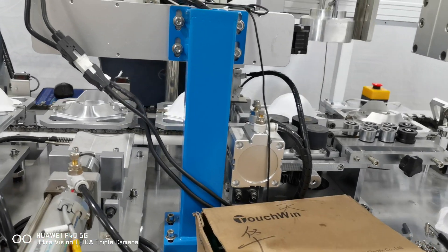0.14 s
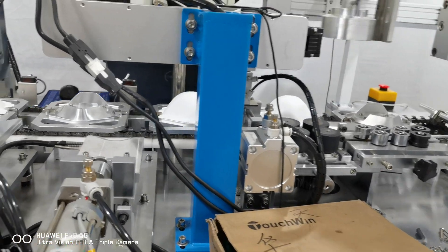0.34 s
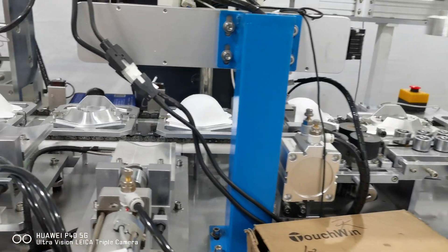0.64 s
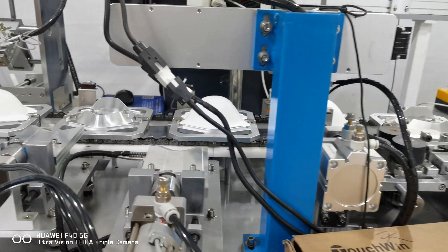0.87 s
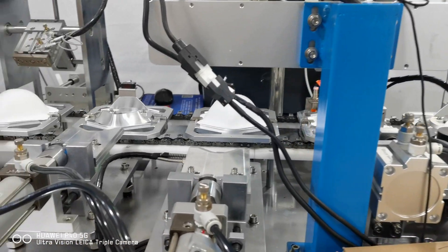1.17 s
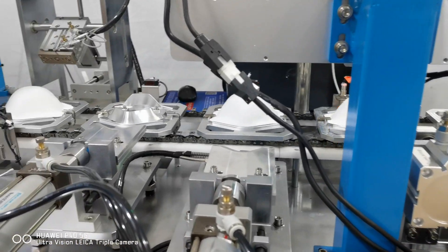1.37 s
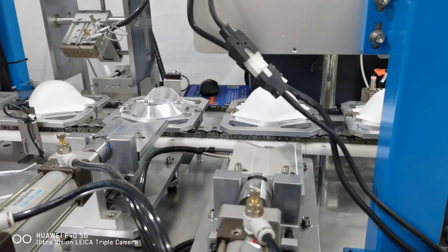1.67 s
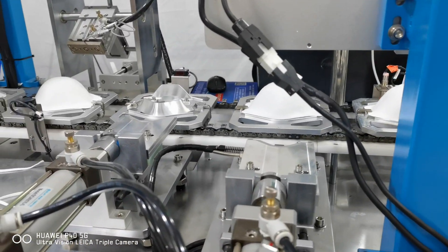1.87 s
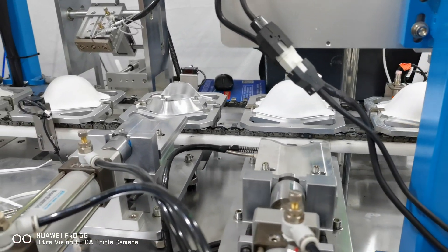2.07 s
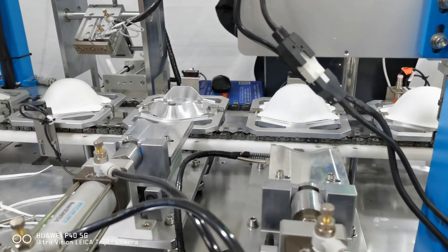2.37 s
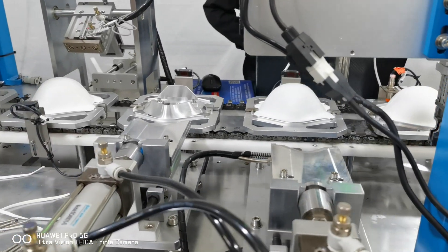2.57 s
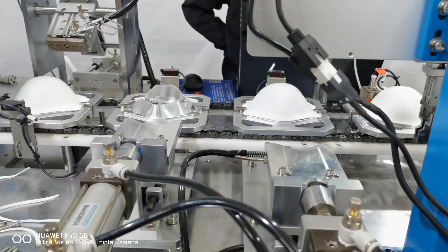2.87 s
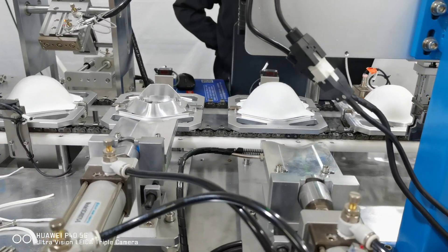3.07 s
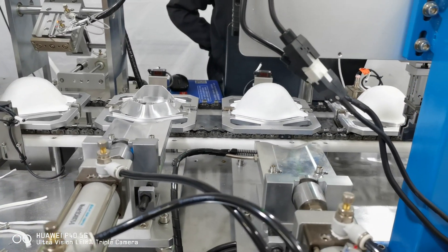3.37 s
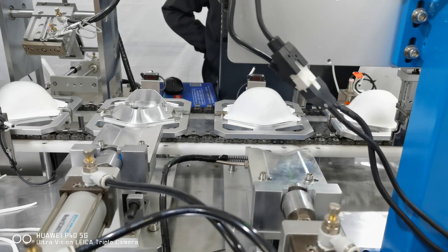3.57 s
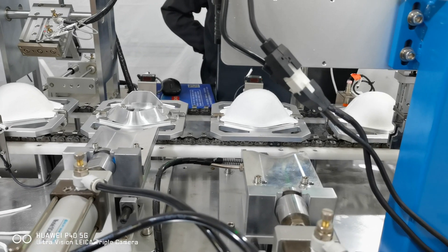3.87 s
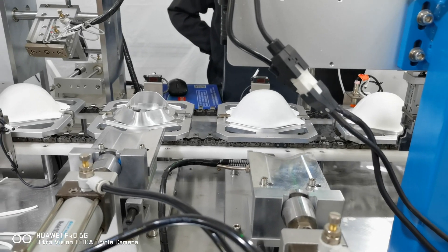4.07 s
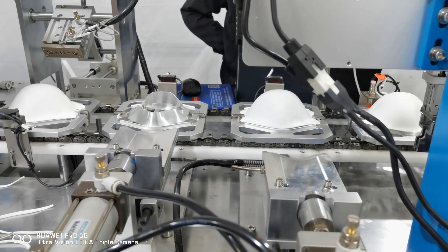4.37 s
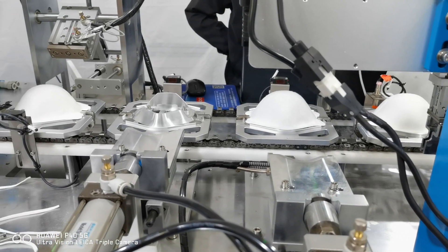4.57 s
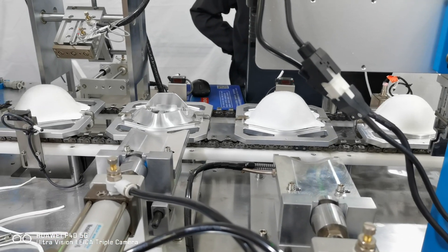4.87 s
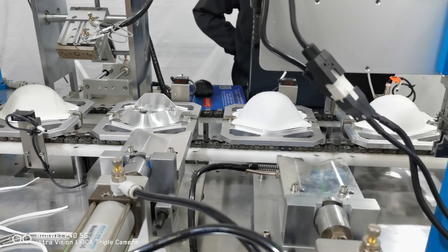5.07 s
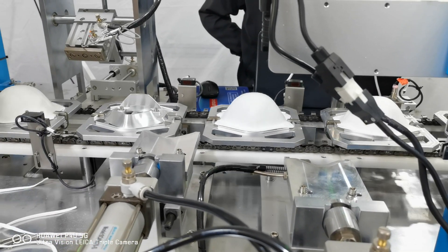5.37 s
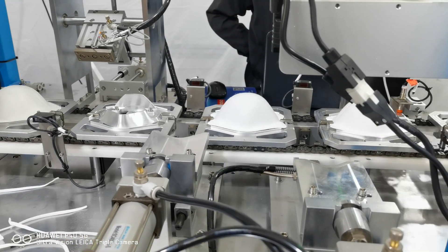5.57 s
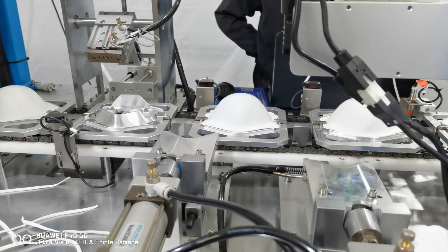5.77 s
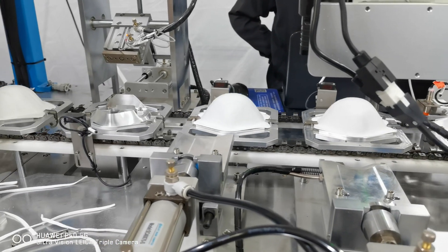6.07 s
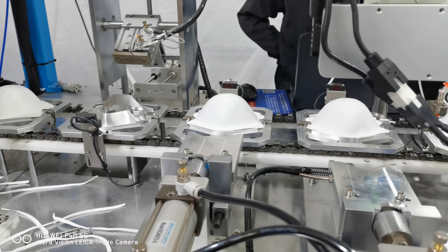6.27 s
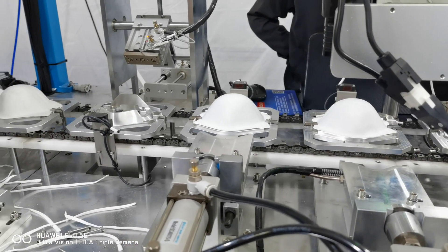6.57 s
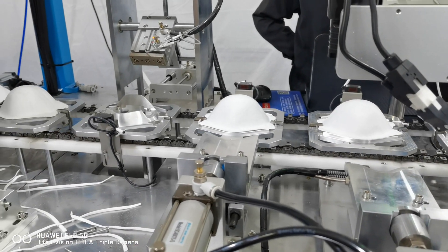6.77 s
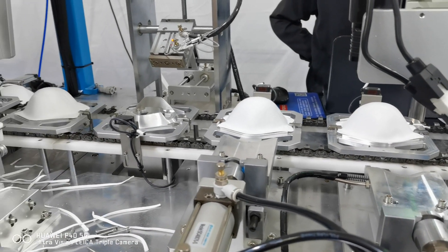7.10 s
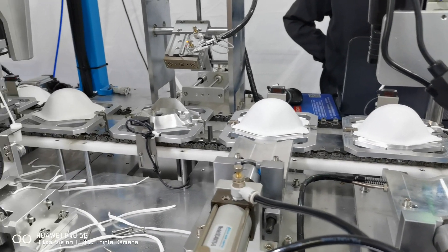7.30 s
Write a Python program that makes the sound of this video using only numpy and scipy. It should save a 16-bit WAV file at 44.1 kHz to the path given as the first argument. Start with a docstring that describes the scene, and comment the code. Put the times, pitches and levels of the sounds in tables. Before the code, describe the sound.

Factory machine venting compressed air in long hisses and short puffs, with valve clacks, thuds and a very high-pitched whistle.

```python
"""A factory hall with an automatic mask line, heard a metre away by a hand-held microphone pair.
Air cylinders vent as turbulent jets, in long spitting hisses and short puffs. The horn of an ultrasonic
welder whistles near the top of hearing, fading at the nodes of its standing waves. Impacts excite
damped modes: valves and stops clack, slides thud into the frame, metal rings on. Drives whine
faintly, the chain scrapes and the hall rumbles underneath."""
import sys
import numpy as np
from scipy import signal
from scipy.fft import rfft, irfft
from scipy.io import wavfile
from scipy.ndimage import uniform_filter1d

SR = 44100
rng = np.random.default_rng(int(sys.argv[2]) if len(sys.argv) > 2 else 0)


def put_to_file(sound):
    """Save the sound as 16-bit audio at rate SR, in the file named by the first command-line argument."""
    columns = np.atleast_2d(sound).T  # one column per channel
    safe = np.clip(columns, -1, 1)
    whole_steps = np.round(safe * 32767)
    wavfile.write(sys.argv[1], SR, whole_steps.astype(np.int16))


N = 328104
T = np.arange(N) / SR
HZ = np.maximum(np.arange(N // 2 + 1) * SR / N, 1)

# Noise spectra. Each row: frequency in Hz, relative spectral density in dB.
JET_SPECTRUM = [(2060, -30), (3500, -20.5), (4390, -12.5), (4920, -10), (5680, -3.5), (6360, -5),
                (7240, -5.5), (8800, -1.5), (9560, -5.5), (12000, -26), (15600, -47), (22000, -120)]
HOSE_SPECTRUM = [(760, -19), (1300, -10.5), (1520, -13.5), (2030, 1.5), (2290, -0.5), (2480, 2), (3240, 0),
                 (4600, -7), (5980, -11.5), (10100, -120)]
FINE_HISS_SPECTRUM = [(6470, -73.5), (11000, 13), (11800, 6.5), (13100, 3.5), (15100, 7.5), (16000, -55)]
RUMBLE_SPECTRUM = [(15, -69), (25, -36), (48, -11), (66, -2), (102, -1), (200, 1), (251, -4.5), (288, -0.5),
                   (500, -36), (650, -18), (1100, -120)]
SLIDE_SPECTRUM = [(210, -58), (360, 0.5), (461, -5), (518, -7), (650, -3), (1360, -6.5), (1700, -7.5),
                  (2210, -14), (3740, -120)]
# Releases of air. Each row: start, swell and hold in seconds, bright jet level in dB, dull jet and
# hose roar in dB relative to it.
AIR_RELEASES = [(-.1, 0.065, 1.476, -17.5, -5.5, -21), (-.1, 0.054, 0.4, -35, 9, -0.5),
                (1.458, 0.017, 0.21, -27, -5, -5.5), (1.756, 0.017, 0.028, -39.5, 6, -1),
                (1.849, 0.089, 0.12, -30, -6.5, -13), (2.266, 0.069, 0.028, -37.5, 0, -6.5),
                (2.39, 0.097, 0.024, -25.5, -2.5, -10), (2.582, 0.0087, 0.021, -29, -2, -5.5),
                (2.666, 0.01, 0.077, -26.5, 0, -8.5), (2.76, 0.049, 0.11, -36.5, -5, -13),
                (2.93, 0.18, .03, -30, -2, -14), (3.241, 0.02, 0.032, -29, -1, -11),
                (3.368, 0.0087, 0.018, -29, 0, -9), (3.454, 0.14, 0.48, -41, -2, -13.5),
                (3.906, 0.084, 0.16, -33.5, -2.5, -12), (4.17, 0.097, 0.11, -30.5, -3, -20),
                (4.39, 0.026, 0.11, -31.5, -6, -22), (4.587, 0.045, 0.062, -25, 1.5, -13.5),
                (4.717, 0.14, 1.57, -15, -5, -19), (6.45, 0.0086, 0.036, -22, 0.5, -12.5),
                (6.54, 0.0083, 0.099, -23, -2.5, -10), (6.657, 0.023, 0.094, -30, 2.5, -9.5),
                (6.803, 0.041, 0.16, -28.5, 0, -5), (7.021, 0.03, 0.01, -21.5, 0.5, -12.5),
                (7.271, 0.022, 0.011, -29.5, 1.5, -10), (7.383, 0.046, 0.13, -32, -8, -7)]
# The steady leak. In order: bright jet, dull jet and hose levels in dB.
STEADY_LEAK_DB = [-45, -49, -55]
# Pitch of the welder's horn. Each row: time in seconds, frequency in Hz.
HORN_PITCH = [(1, 15240), (1.2, 15240), (2.06, 15012), (3.3, 15012), (6.78, 15215), (7.05, 15205),
              (7.44, 15105)]
# Power steps as the horn presses the work. Each row: start and end in seconds, left and right in dB.
HORN_POWER = [(0.996, 1.67, -22.5, -29), (1.696, 2.084, -12, -17.5), (2.055, 3.002, 0.5, -4.5),
              (6.796, 7.067, -24.5, -29), (7.06, 7.6, -16, -26)]
# Standing-wave nodes, a left list and a right. Each row: time in seconds, depth in dB, half width
# in seconds.
HORN_NODES = [
    [(1.38, 7, 0.036), (1.495, 8, 0.025), (1.594, 18, 0.013), (1.736, 21, 0.03), (2.05, 22, 0.039),
     (2.2, 21, 0.0067), (2.41, 11, 0.054), (2.53, 13, 0.16), (6.985, 10, 0.064), (7.2, 13, 0.017),
     (7.347, 28, 0.0068)],
    [(1.08, 18, 0.036), (1.5, 15, .04), (2.118, 15, 0.017), (2.204, 23, 0.0091), (2.365, 13, 0.018),
     (2.57, 16, 0.046), (2.883, 17, 0.014), (7.146, 12, 0.031), (7.215, 20, 0.019), (7.358, 13, 0.018)],
]
# Phase of the horn tone. Each row: time in seconds, lead of left over right in cycles.
HORN_LEAD = [(1.0, -3.5), (1.79, .5), (1.895, 1.5), (2.03, 5), (2.135, 5.5), (2.55, 5.5), (2.75, 6.5),
             (2.92, 5), (6.8, 7.5), (7.3, 4.5)]
# Valves and end stops. Each row: start in seconds, level in dB, ring frequency in Hz, ring T60 in
# seconds, relative level of the low modes in dB, left minus right in dB.
VALVE_HITS = [(1.458, -8, 5960, 0.11, -44, -7), (1.482, -4, 6300, 0.26, -43, -4.5),
              (1.582, -12.5, 8200, 0.15, -19.5, 4), (1.7668, -18, 6600, 0.15, -27, -7),
              (2.097, -23.5, 9400, 0.067, -19, 8), (2.5094, -18, 4860, 0.17, -38, -6),
              (2.5898, -5, 8700, 0.075, -37, 1), (3, -22, 8100, 0.21, -24, -2),
              (3.111, -5, 9340, 0.034, -32.5, 0), (3.2747, -13, 9150, 0.083, -25.5, 2),
              (3.379, -8, 8650, 0.13, -30.5, 0), (4.0498, -12.5, 8700, 0.099, -19.5, 1),
              (4.472, -15, 8400, 0.11, -31, 2), (4.605, -20, 6200, 0.25, -40, -5),
              (4.694, -9, 8750, 0.091, -30, -1), (6.4596, -10.5, 5970, 0.15, -28, -7),
              (6.4867, -8.5, 6300, 0.085, -49, -14), (6.59, -10, 8640, 0.11, -19.5, 1),
              (7.0434, -12.5, 6600, 0.15, -29, -9), (7.297, -17.5, 9250, 0.081, -33, 10)]
# Modes of a stop and of the machine bed. Each row: frequency in Hz, bandwidth in Hz, level in dB.
STOP_RESONANCES = [(1940, 300, 4), (2430, 180, 2.5), (2790, 140, 6.5), (3250, 590, 3), (4500, 2000, 3)]
BED_RESONANCES = [(89, 27, 2), (126.2, 27, 7.5), (177, 26, 5), (254.6, 47, 2), (313, 96, 6),
                  (443, 113, 4.5)]
# Slides landing. Each row: start in seconds, level in dB, T60 at 200 Hz in seconds, best-struck
# frequency in Hz, fall-off from it in dB per octave, relative plate and upper rattle levels in dB.
LANDINGS = [(0.085, -16, 0.84, 200, 7.5, -13, -8.5), (1.374, -28, 0.61, 135, 4, -1, 3),
            (1.482, -15, 0.46, 460, 20, -9.5, -7.5), (1.577, -28, 1, 318, 2.5, -5.5, -12),
            (1.947, -28, 0.43, 89, 42, -3, -1), (2.059, -38.5, 0.35, 87, -4.5, 7.5, -12),
            (2.358, -37, 0.65, 177, 0, 0.5, 4), (2.588, -33, 0.84, 186, 10, 2.5, -6),
            (2.672, -16, 0.69, 277, 20, -11.5, -8), (2.994, -26.5, 0.82, 206, 21, -6, -9),
            (3.377, -25, 0.68, 186, 29, -5.5, -8), (3.983, -28.5, 0.89, 207, 18, -23, -18),
            (4.237, -32, 1, 116, 10, -23, -9.5), (4.59, -34, 1, 118, 0, -3.5, -16),
            (4.691, -26, 0.79, 241, 22, -9, -10), (5.459, -31, 0.56, 91.5, 7, -9, -15),
            (5.818, -24, 1, 159, 1, -3, 6.5), (6.474, -17.5, 0.53, 460, 10, -11, -14),
            (6.569, -23, 1, 261, 11, -5.5, -2), (6.838, -23.5, 0.55, 110, 13, -8.5, -16),
            (6.939, -33, 0.22, 95, 18.5, 11, 14.5), (7.041, -14.5, 0.8, 433, 9, -7.5, -8)]
# Ringing metal parts, low knocks and the hum of thuds. Each row: start in seconds, frequency in Hz,
# level in dB, T60 in seconds.
IMPACT_TONES = [(0.083, 166, -29, 0.55), (0.106, 314, -28, 0.66), (1.405, 457, -30.5, 0.31),
                (1.478, 454, -28, 0.35), (1.578, 1620, -28, .25), (1.77, 2110, -32.5, .12),
                (1.766, 5480, -20.5, 0.24), (1.776, 3811, -34.5, 0.35), (1.942, 718, -34.5, 0.081),
                (2.057, 92, -29, 0.17), (2.093, 128, -26, .06), (2.093, 1840, -33, 0.11),
                (2.092, 13100, -24, .12), (2.11, 274, -36, 0.38), (2.384, 2130, -32, 0.16),
                (2.592, 684, -35, .2), (2.674, 281, -31, .4), (2.996, 799, -33.5, 0.21),
                (2.997, 2560, -31.5, .12), (3.111, 1780, -40, 0.11), (3.603, 1970, -43, 0.11),
                (3.38, 4290, -30, .15), (3.272, 4760, -23, .1), (3.796, 2570, -38, 0.13),
                (4.049, 2400, -17.5, 0.028), (4.049, 4350, -28, 0.037), (4.052, 1365, -25.5, .22),
                (4.698, 453, -30.5, 0.29), (5.816, 134, -21, 0.37), (6.5, 280, -29, 0.43),
                (6.611, 125, -31, 0.57), (6.579, 1643, -23, 0.35), (7.042, 428, -22, 0.29),
                (7.058, 1340, -19.5, 0.3), (7.138, 300, -27, 0.41), (7.295, 6490, -13, 0.15),
                (7.345, 6450, -25, 0.24)]
# A cylinder emptying. Each row: time in seconds, frequency in Hz, level in dB.
SIGH_CURVE = [(3.0, 5900, -45), (3.09, 5400, -34.5), (3.24, 4700, -41), (3.34, 4300, -49)]
# Drive electronics and motors. Each row: start and end in seconds, frequency in Hz, level in dB.
DRIVE_TONES = [(0, 7.1, 8003, -50), (1.5, 4.6, 8103, -52), (2.3, 2.95, 10680, -51), (7.07, 7.5, 10640, -55),
               (3.8, 4.03, 870, -54), (.45, 1.05, 880, -57), (3.5, 3.75, 400, -56), (3.5, 4.03, 2600, -59)]
# Slides and chain moving. Each row: start, swell and hold in seconds, level in dB.
SLIDE_STROKES = [(1.012, 0.04, 0.12, -44), (1.435, 0.072, 0.089, -33), (2.322, 0.054, 0.14, -44.5),
                 (3.25, 0.19, 0.038, -45), (3.746, 0.069, 0.28, -48.5), (5.15, 0.22, 1.4, -50),
                 (6.747, 0.22, 0.041, -38), (7.195, 0.16, 0.067, -44)]
# Reflections from panels and rails. Each entry: delay in seconds.
ECHO_DELAYS = [.0014, .0018, .0027, .0046, .0071, .0104, .0153]
# Coherence of the sound field. Each row: frequency in Hz, left-right correlation from 0 to 1.
COHERENCE = [(70, 0.96), (130, 0.99), (250, 0.89), (400, 0.77), (700, 0.41), (1500, 0.22), (5000, 0.29),
             (9000, 0.22)]
# Colouring of the two microphones. Each row: frequency in Hz, left minus right in dB.
MIC_BALANCE = [(60, 3.5), (200, 0.5), (700, 1), (1500, -2), (5500, -6.5), (7500, -2.5), (9500, 10),
               (11300, 3.5), (13500, 13)]

RIGHT_LAG_S = 21 / SR  # applies above 1 kHz


def air_jets():
    """Turbulence radiates broadband noise: jets spit through silencers while hoses roar lower down."""
    start, rise, hold, db, dull_db, hose_db = np.transpose(AIR_RELEASES)
    t60 = np.where(hold > 1, 0.16, 0.4)[:, None]  # a long blow is shut off; a puff runs out
    vented = swells(start, rise, hold, db + np.array([0 * db, dull_db, hose_db]), t60)
    jet, dull_jet, roar = np.hypot(vented, undb(STEADY_LEAK_DB)[:, None])
    flutter = undb(0.47 * wander(40) + 0.5 * wander(300))
    bright = field_noise(band(JET_SPECTRUM, lo_hz=6900), spit_db=2.5) * jet
    dull = field_noise(band(JET_SPECTRUM, hi_hz=7190), spit_db=3.0) * dull_jet
    hose = field_noise(band(HOSE_SPECTRUM), spit_db=1.0) * roar
    # The topmost hiss is turned down when the jet is quiet.
    shortfall_db = np.clip(20 * np.log10(jet) + 18, -14, 0)
    fine = field_noise(band(FINE_HISS_SPECTRUM)) * jet
    fine *= undb(-19.5 + 5.8 * shortfall_db + 1.5 * wander(13))
    return 0.8 * reflect(flutter * (bright + dull) + hose + fine, share=0.31)


def welder():
    """A resonant horn gives a near-pure tone; as it slides down to lock, modulation adds a buzz."""
    hz, = over_time(HORN_PITCH)
    locked = np.clip((15040 - hz) / 28, 0, 1)
    sideband = undb(-16 + 4 * wander(8)) * np.exp(-2j * np.pi * 65 * T)  # 65 Hz below the tone
    # The path difference shifts as the hand moves.
    drift = np.array([0 * T, 0.12 * wander(7.9) - 2 * np.pi * over_time(HORN_LEAD)[0]])
    waver = 1 + 0.13 * np.array([wander(17), wander(25.85)])
    buzz = 0.74 * np.array([wander(90), wander(78)]) + sideband
    level = horn_level()
    swing = np.sqrt(2) * level * (waver + locked * buzz)
    swing = swing / (1 + (abs(swing) / .7) ** 4) ** .25  # the loudest swells level off
    halo = undb(-26) * field_noise(1 / (1 + ((HZ - 15000) / 350) ** 4))
    phase = 2 * np.pi * np.cumsum(hz) / SR + drift
    return np.real(swing * np.exp(1j * phase)) + level * halo


def horn_level(step_s=0.027):
    """Interference: the horn's stepped level dips as each microphone crosses a standing-wave node."""
    start, end, *db = np.transpose(HORN_POWER)
    drive = swells(start, np.full_like(start, step_s), end - start - step_s, np.array(db), t60=0.15)
    dips_db = [sum(depth / (1 + ((T - s) / width) ** 2) for s, depth, width in side)
               for side in HORN_NODES]
    return drive * undb(-np.array(dips_db))


def valve_clacks():
    """Impact excites a wide band: a sharp tick, a ring of small steel parts, the stop's lower modes."""
    out = np.zeros((2, N))
    t = T[:SR // 4]
    lowpass = signal.butter(8, 10800, fs=SR, output="sos")
    highpass = signal.butter(3, 4000, "high", fs=SR, output="sos")
    for start, db, hz, t60, low_db, pan_db in VALVE_HITS:
        burst = signal.sosfilt(lowpass, rng.standard_normal((2, len(t))))
        fade = decay(t, t60)
        resonator = signal.iirpeak(hz, Q=6.0, fs=SR)
        ring = signal.lfilter(*resonator, signal.lfilter(*resonator, burst))
        tick = signal.sosfilt(highpass, burst) * (0.21 * fade ** 2 + 0.35 * np.exp(-t / 0.0023))
        stop = sum(undb(mode_db) * signal.lfilter(*signal.iirpeak(f, f / width, fs=SR), burst)
                   for f, width, mode_db in STOP_RESONANCES)
        knock = stop * (np.exp(-t / 0.0063) + 0.38 * np.exp(-t / 0.054))
        hit = 1.2 * ring * fade + tick + 4.2 * undb(low_db) * knock
        add_at(out, start, undb(db) * pan(pan_db)[:, None] * hit)
    return out


def slide_thuds():
    """Modal damping: landings shake the bed's broad modes; high modes and loose plates die sooner."""
    start, db, t60, struck_hz, fall_db, plate_db, upper_db = np.transpose(LANDINGS)
    peaks = [[undb(mode_db) / (1 + ((HZ - hz) / (width / 2)) ** 2) / np.sqrt(width)]
             for hz, width, mode_db in BED_RESONANCES]
    bed = 0
    for mode, (hz, _, _) in zip(field_noise(np.array(peaks)), BED_RESONANCES):
        struck_db = db - fall_db * abs(np.log2(hz / struck_hz))
        bed += mode * blows(start, struck_db, t60 * (200 / hz) ** 0.37, rise_s=0.0043)
    plates = field_noise(band(SLIDE_SPECTRUM, lo_hz=560))
    plates *= blows(start, db + plate_db, 0.57 * t60, rise_s=0.014)
    upper = field_noise(band(HOSE_SPECTRUM)) * blows(start, db + upper_db, 0.53 * t60, rise_s=0.021)
    return 0.3 * bed + 1.02 * (plates + upper)


def impact_tones():
    """Beating: ringing metal parts, low knocks and the hum of thuds each sound on a few close modes."""
    out = np.zeros((2, N))
    t = T[:SR // 2]
    for (start, hz, db, t60), jitter in zip(IMPACT_TONES, rng.random((len(IMPACT_TONES), 4))):
        lagged = t - np.array([[0], [RIGHT_LAG_S * (hz > 1000)]])
        offsets_hz = 69 * np.sqrt(hz / 2000) * (np.array([-2, -1, 0, 1]) + jitter)
        neighbours = sum(np.sin(2 * np.pi * f * lagged) for f in hz + offsets_hz)
        tone = np.sin(2 * np.pi * hz * lagged) + 0.4 * neighbours
        attack = 1 - np.exp(-t / 0.0033)
        fade = (.5 + np.exp(-t / 0.011)) * decay(t, t60)  # the first instant is louder
        add_at(out, start, undb(db) * tone * attack * fade)
    return out


def cylinder_sigh():
    """Narrow-band noise on a sinking pitch is heard as the breathy whistle of an emptying cylinder."""
    hz, db = over_time(SIGH_CURVE)
    breath = np.array([wander(750) + 1j * wander(750) for _ in range(2)])
    on = (T > SIGH_CURVE[0][0]) * (T < SIGH_CURVE[-1][0])
    return on * undb(db) * np.real(breath * np.exp(2j * np.pi * np.cumsum(hz) / SR))


def drive_whines():
    """Random modulation: thin tones waver in level; the low motor whines break up in level and phase."""
    out = 0
    for start, end, hz, db in DRIVE_TONES:
        on = uniform_filter1d(1. * (T > start) * (T < end), size=2000)
        roughness = 1.4 * wander(90) * (hz < 5000)
        phase = 2 * np.pi * hz * T + roughness + np.array([[0], [1]])
        out += on * undb(db + wander(4.3) + 3 * roughness) * np.sin(phase)
    return np.sqrt(2) * out


def rumble_and_scrape(bed_idle_db=-48.5, chain_idle_db=-55.5):
    """Reverberation booms over the idling bed after each landing; friction makes the chain scrape."""
    start, db = np.transpose(LANDINGS)[:2]
    boom = swells(start, rise=np.full_like(start, 0.073), hold=0, db=db - 21.5, t60=1.76)
    strokes = swells(*np.transpose(SLIDE_STROKES), t60=0.19)
    rumble = field_noise(band(RUMBLE_SPECTRUM))
    scrape = reflect(field_noise(band(SLIDE_SPECTRUM)), share=0.42)
    return np.hypot(undb(bed_idle_db), boom) * rumble + np.hypot(undb(chain_idle_db), strokes) * scrape


def reflect(x, share):
    """Comb filtering: echoes off nearby metal cut spectral ridges that shift as the hand moves."""
    return x + share * sum(np.tanh(wander(3.5)) * np.roll(x, int(s * SR), axis=1) for s in ECHO_DELAYS)


def field_noise(gain, spit_db=0.):
    """Partial coherence: stereo noise of rms 1, part common to both sides, part scattered by the hall."""
    grains = rng.standard_normal((3, N))
    if spit_db:
        grains *= undb(spit_db * np.minimum(rng.exponential(size=(3, N)), 6))
    common, left, right = rfft(grains)
    coherence = np.clip(over_hz(COHERENCE), 0, 1)
    lag = np.exp(-2j * np.pi * HZ * RIGHT_LAG_S * (HZ > 1000))
    direct = np.sqrt(coherence) * np.array([common, common * lag])
    scattered = np.sqrt(1 - coherence) * np.array([left, right])
    out = irfft(gain * (direct + scattered), N)
    return out / out.std()


def swells(start, rise, hold, db, t60):
    """Incoherent sounds add as power: one envelope from many that swell, hold and die away."""
    up = np.clip((T - start[:, None]) / np.maximum(rise, .002)[:, None], 0, 1)
    fade = decay(np.maximum(T - (start + rise + hold)[:, None], 0), t60)
    return np.sqrt(np.sum((undb(db)[..., None] * up * fade) ** 2, axis=-2))


def blows(starts, db, t60s, rise_s):
    """Superposed impact envelopes, each rising fast and dying away."""
    envelope = np.zeros(N)
    t = T[:SR]
    for start, gain, t60 in zip(starts, undb(db), t60s):
        add_at(envelope, start, gain * (1 - np.exp(-t / rise_s)) * decay(t, t60))
    return envelope


def decay(t, t60):
    """Exponential damping, 60 dB in t60 seconds."""
    return undb(-60 * t / np.maximum(t60, .01))


def add_at(out, start, sound):
    """Superpose a sound from a start in seconds."""
    i = int(start * SR)
    out[..., i:i + sound.shape[-1]] += sound[..., :N - i]


def wander(rate):
    """Random levels held 1 / rate seconds and smoothed twice; spread near 1."""
    span = int(SR / rate)
    steps = np.repeat(rng.standard_normal(N // span + 1), span)
    return 1.3 * uniform_filter1d(uniform_filter1d(steps, span), span)[:N]


def band(table, lo_hz=0, hi_hz=30000):
    """Gain of a spectrum table between two soft edges."""
    return undb(over_hz(table)) / np.sqrt((1 + (lo_hz / HZ) ** 16) * (1 + (HZ / hi_hz) ** 16))


def over_hz(table):
    """A spectrum table read at every frequency bin."""
    hz, values = np.transpose(table)
    return np.interp(np.log(HZ), np.log(hz), values)


def over_time(table):
    """Columns of a curve table read at every sample."""
    times, *columns = np.transpose(table)
    return [np.interp(T, times, column) for column in columns]


def pan(db):
    """Left and right gains for a level difference."""
    return undb(np.array([db, -db]) / 2)


def undb(db):
    """Decibels to gain."""
    return np.exp(np.asarray(db) * np.log(10) / 20)


def scene():
    """Superposition: the pressures of all sources add at the microphones."""
    return (air_jets() + cylinder_sigh() + drive_whines() + rumble_and_scrape()
            + welder() + valve_clacks() + impact_tones() + slide_thuds())


def record(dry):
    """Each microphone colours the sound; deep bass is cut, peaks clip and the top is filtered off."""
    balance = pan(over_hz(MIC_BALANCE) * (HZ < 14500))
    coloured = irfft(rfft(dry) * balance / np.sqrt(1 + (68 / HZ) ** 6), N)
    lowpass = signal.ellip(10, .2, 90, 16968, fs=SR, output="sos")
    return signal.sosfilt(lowpass, np.clip(coloured, -1, 1))


dry = scene()
out = record(dry)
put_to_file(out)
```